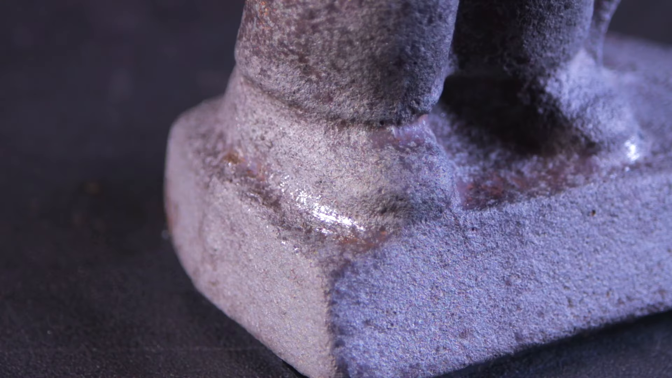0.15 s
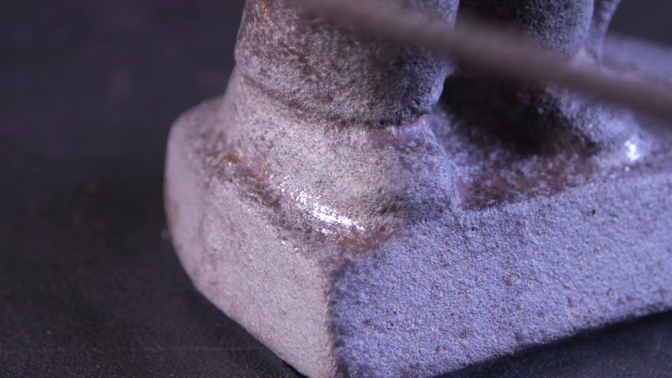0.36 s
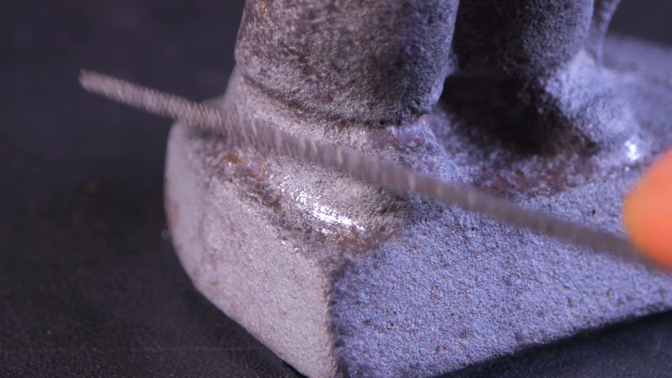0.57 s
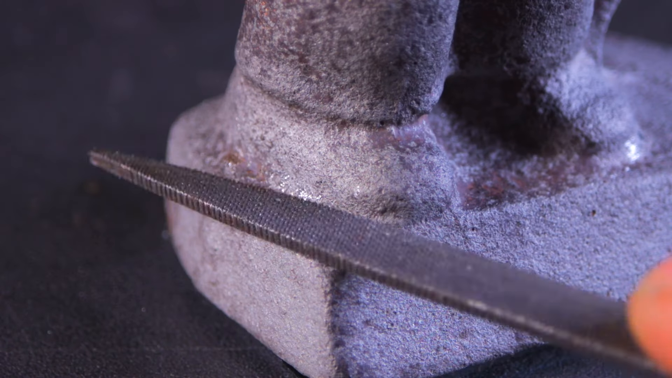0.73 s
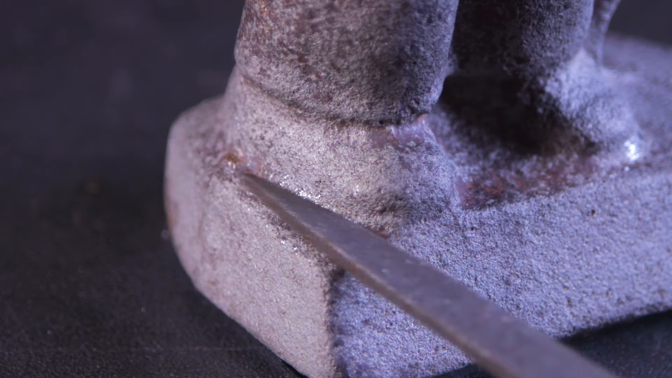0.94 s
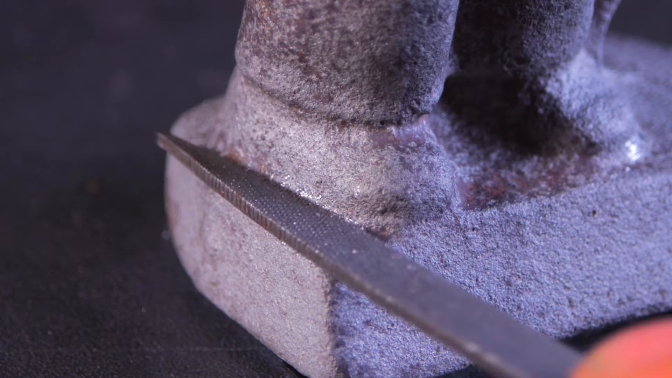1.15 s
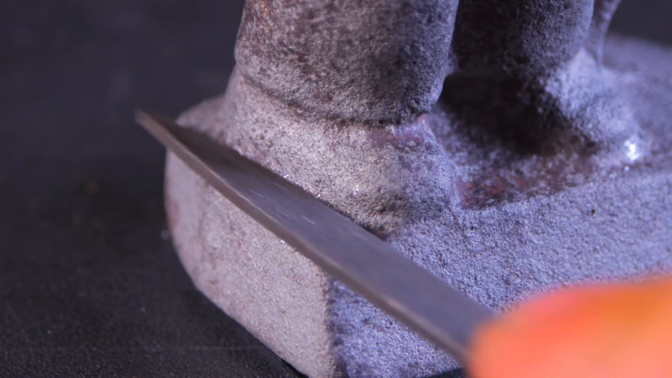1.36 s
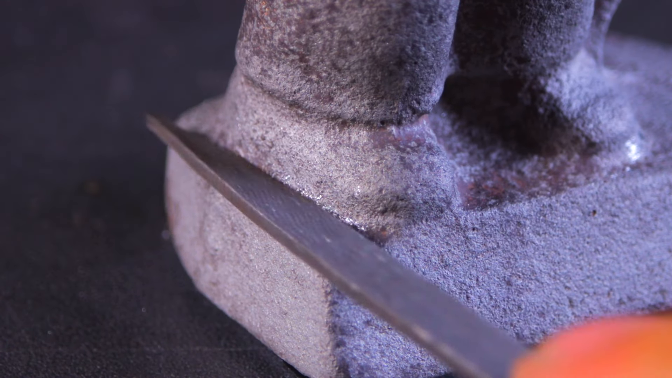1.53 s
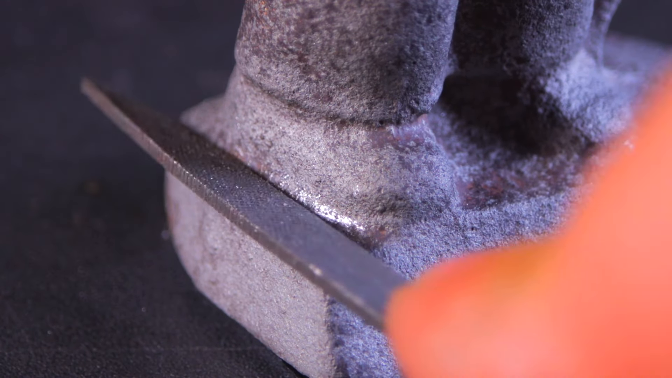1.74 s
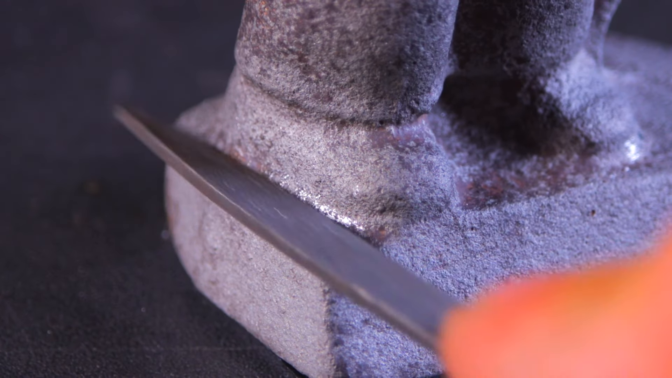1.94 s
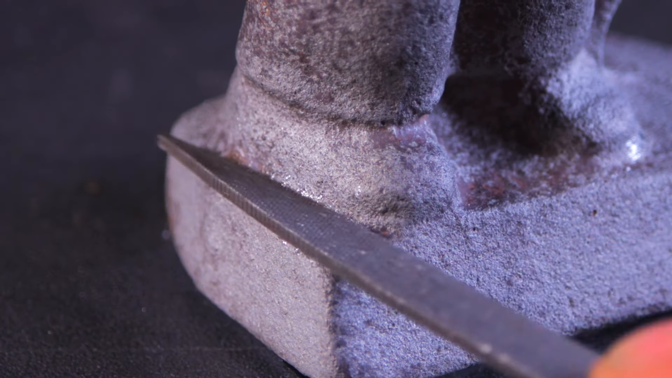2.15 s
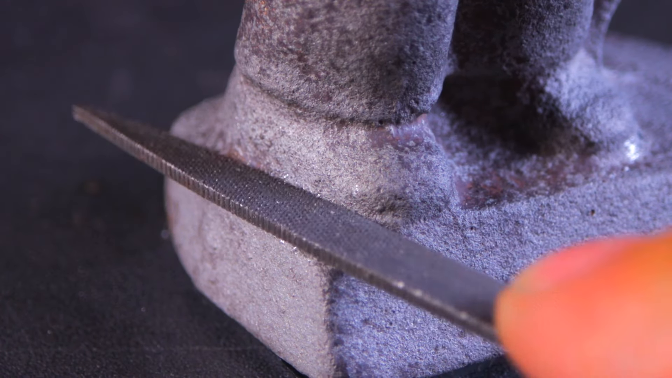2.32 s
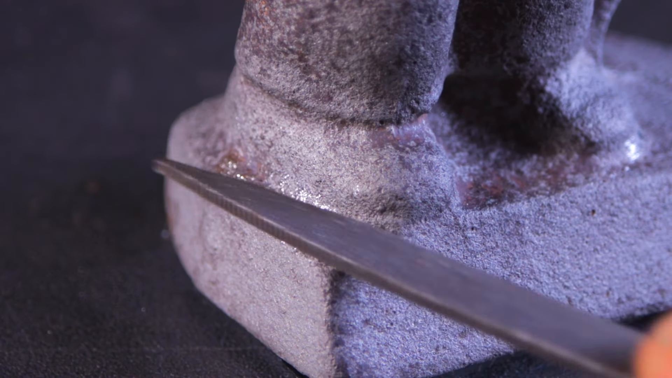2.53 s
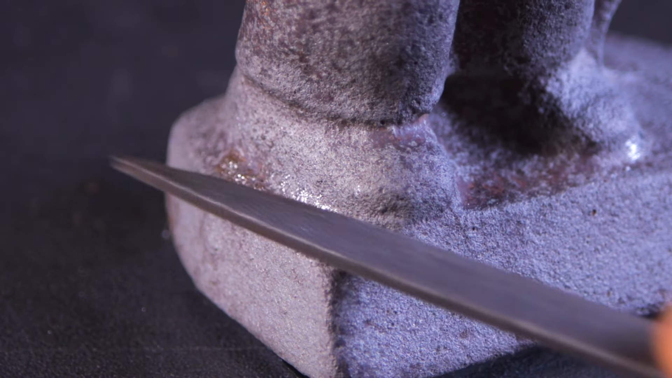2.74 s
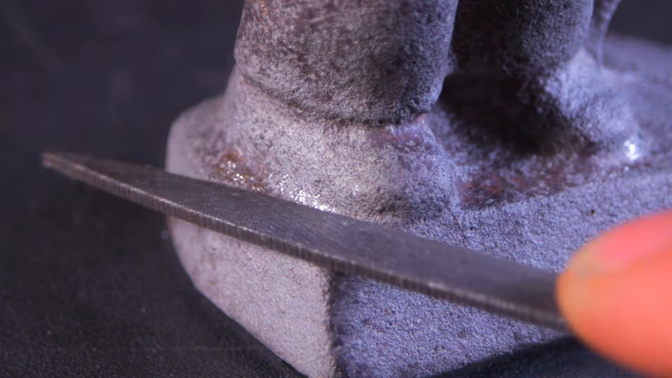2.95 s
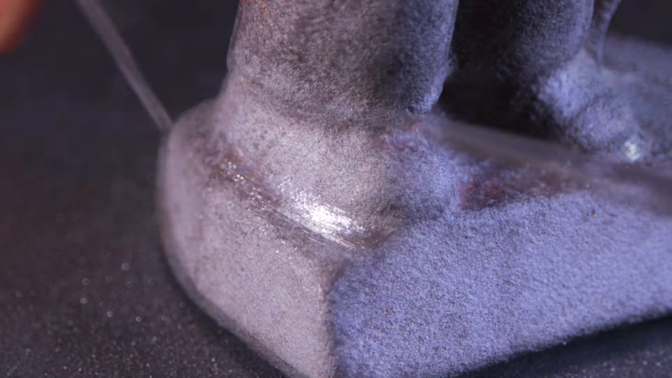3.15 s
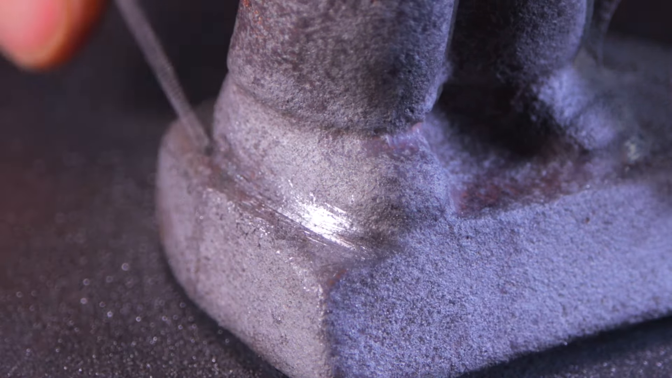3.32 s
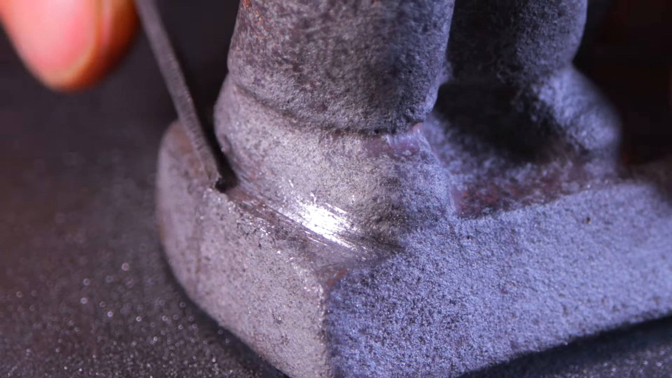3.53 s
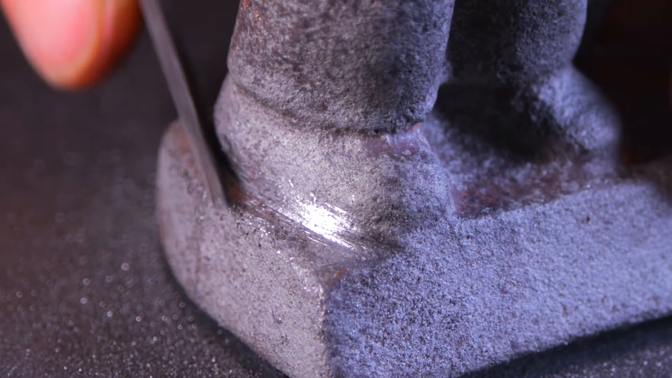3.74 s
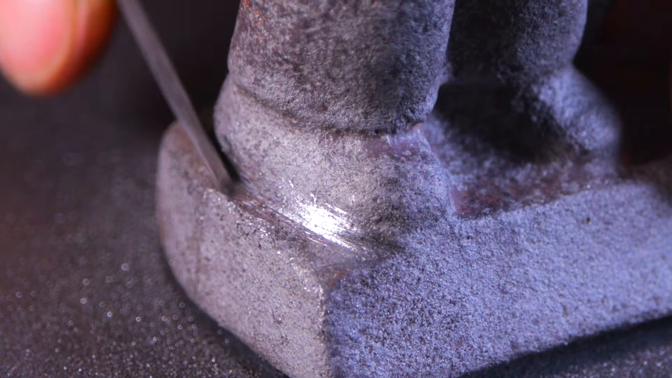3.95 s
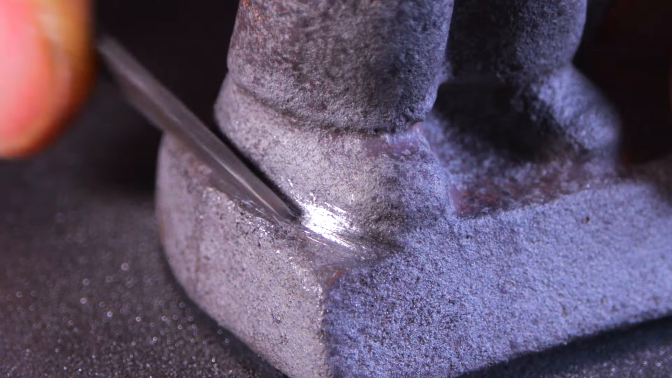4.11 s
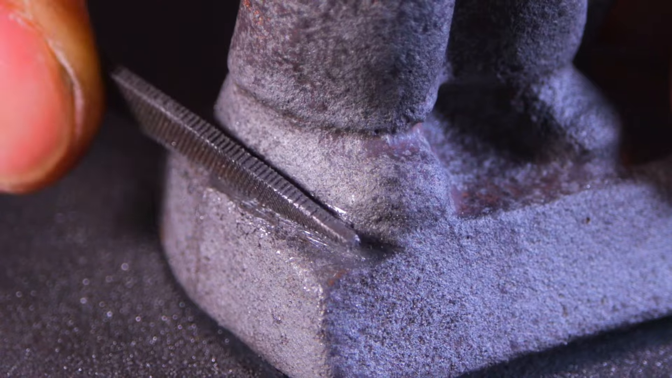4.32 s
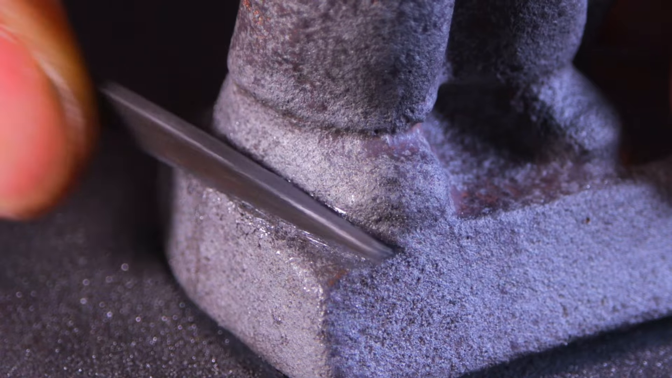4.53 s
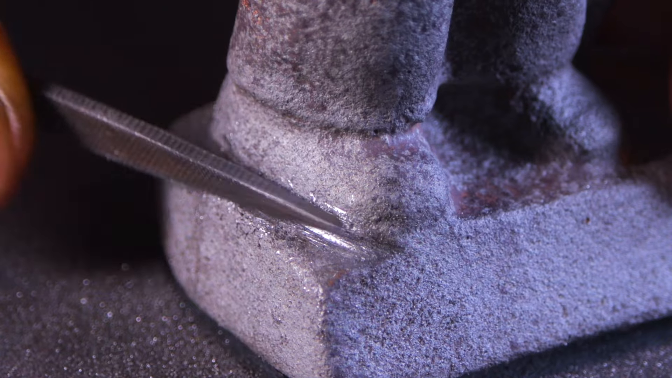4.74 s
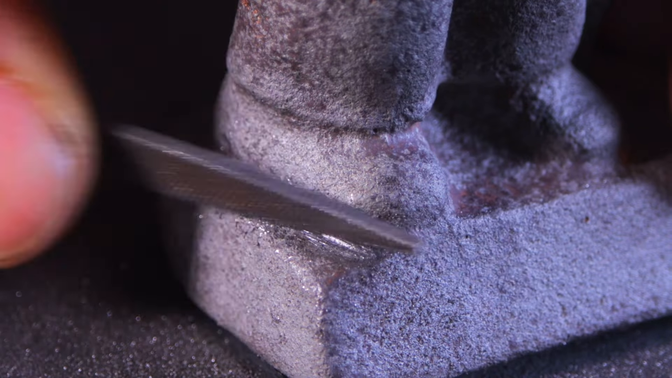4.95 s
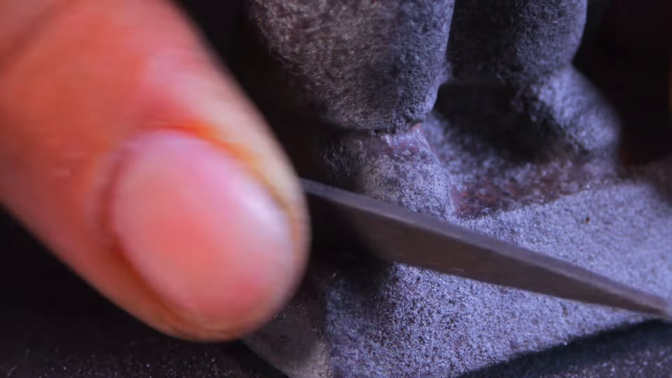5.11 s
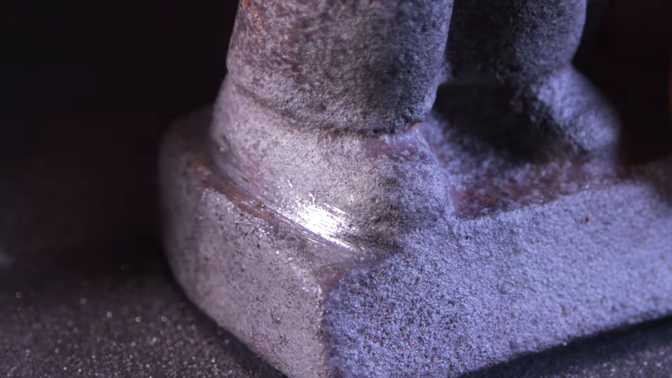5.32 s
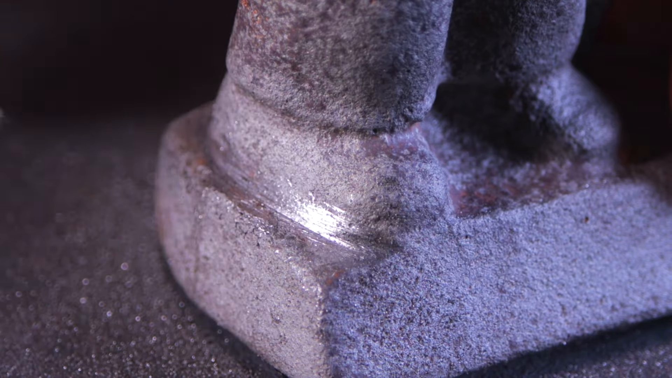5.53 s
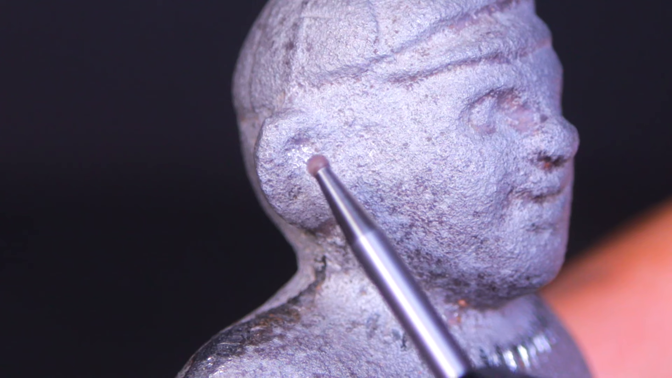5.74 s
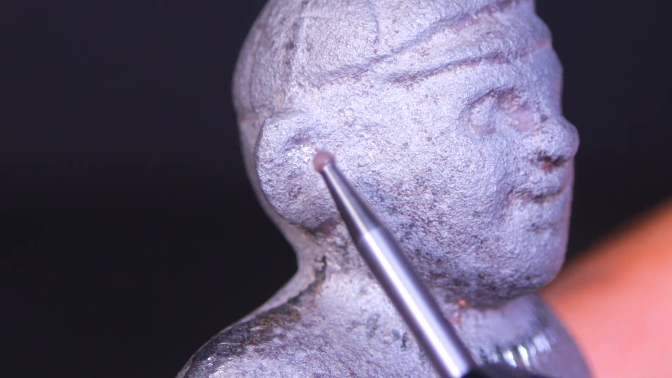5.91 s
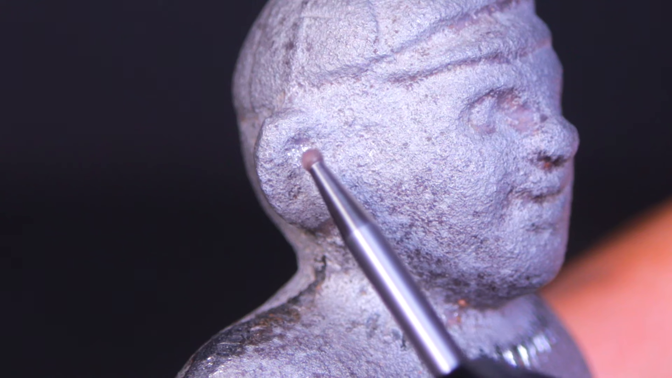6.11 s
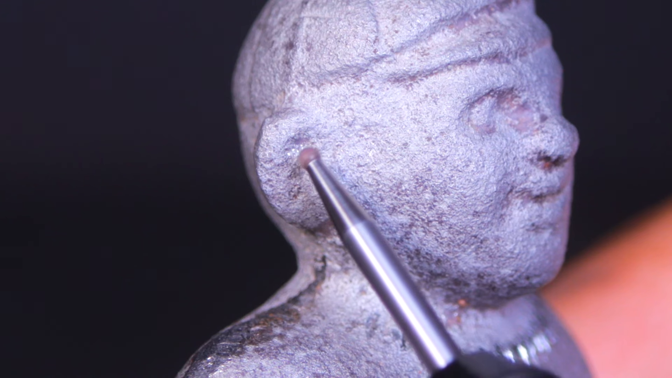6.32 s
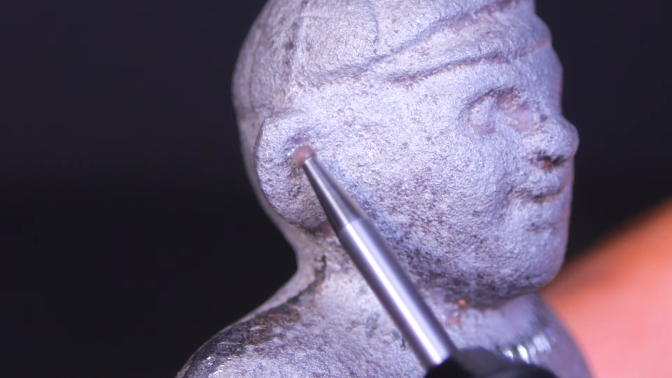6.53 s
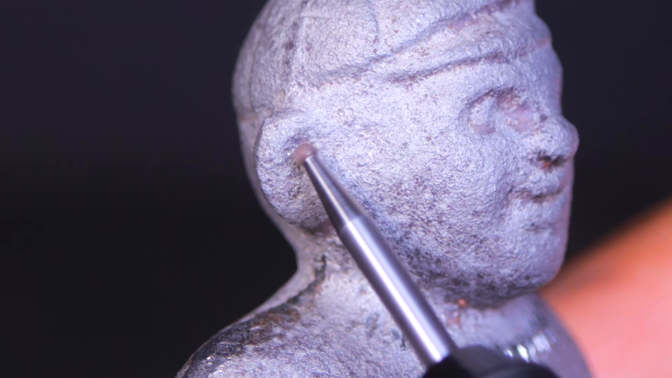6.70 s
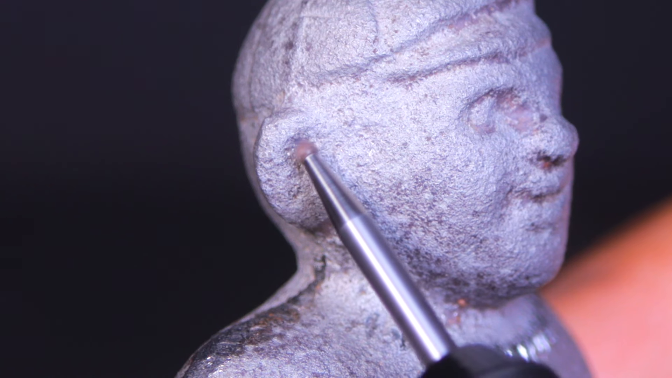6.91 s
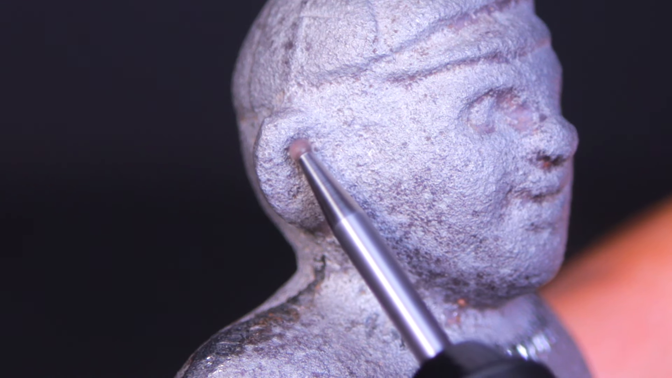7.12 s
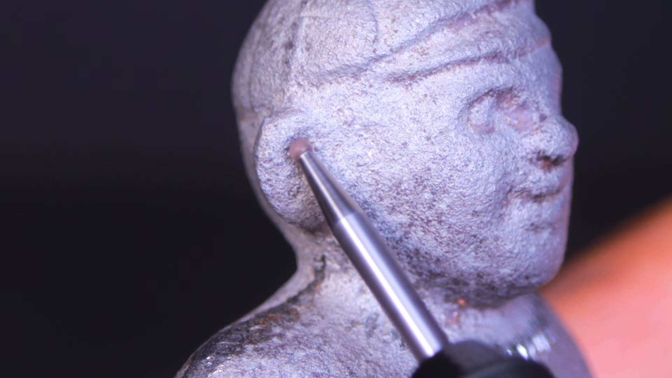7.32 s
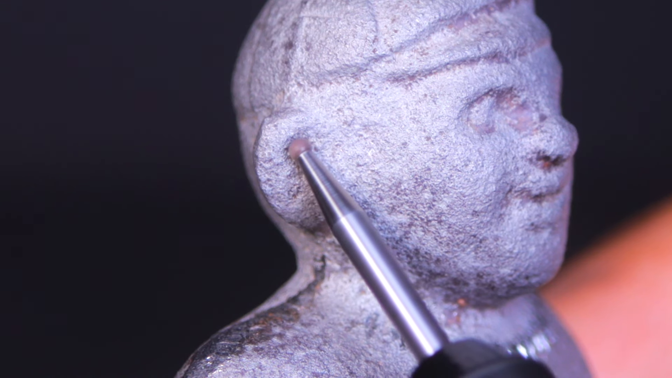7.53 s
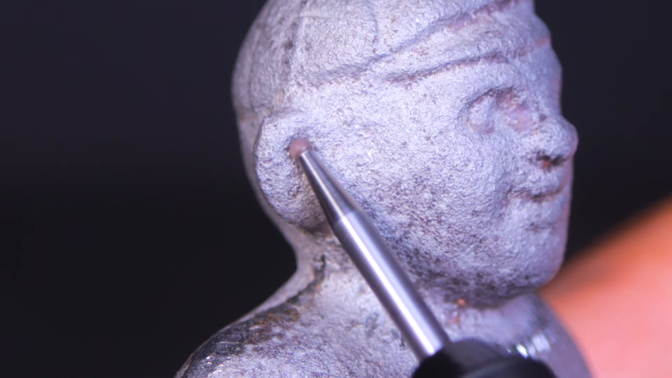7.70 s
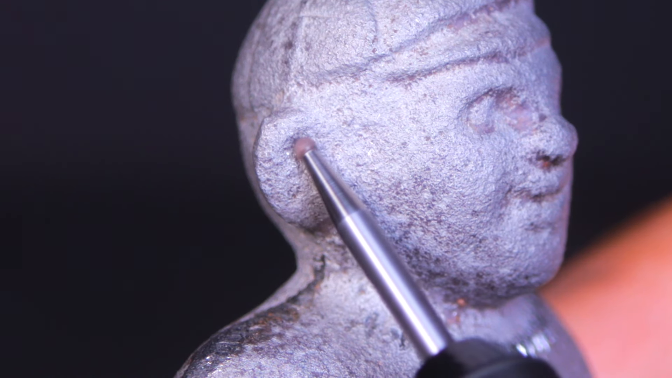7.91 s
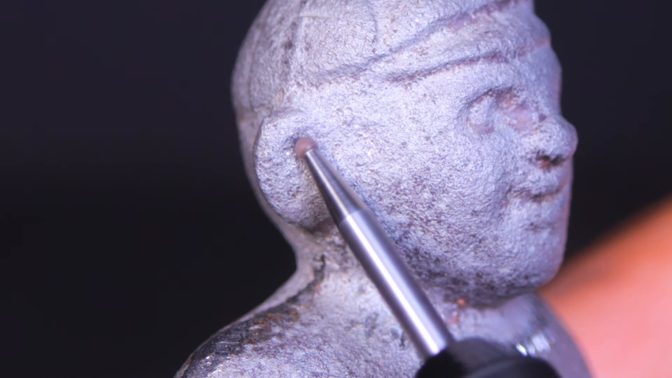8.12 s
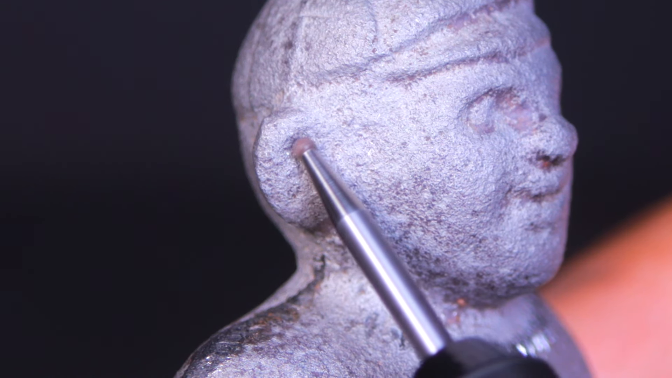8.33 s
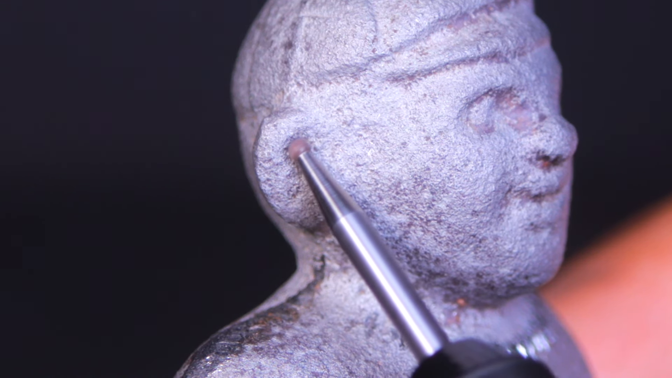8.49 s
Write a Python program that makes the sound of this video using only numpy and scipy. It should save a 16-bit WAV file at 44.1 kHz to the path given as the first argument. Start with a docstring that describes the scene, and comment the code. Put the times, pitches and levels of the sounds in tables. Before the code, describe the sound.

A small, dry, quiet workshop heard through two close microphones, with low rumble, soft hiss and, until about 3.2 s, a very faint high whistle. At 0.66-0.77 s a needle file clatters against a small cast-metal figure, its last knocks brightest. From 1.0 to 3.0 s the flat of the file rubs to and fro in short gritty rasps, about seven a second, stronger after 1.65 s, with metallic ringing, stray clicks and dull rocking on the bench. A few knocks follow near 3.1 s. From 3.45 to 5.2 s the tip files in similar but quieter, brighter strokes, starting faintly. At 5.73 s a rotary tool cuts in abruptly with a steady, airy, fluttering whirr and faint high whine. At 7.46 s its bit touches metal, dips, then chatters loudly around 7.6 s, thickening after 7.8 s into rough, buzzing grinding that continues to the end at about 8.6 s.

```python
"""A quiet workshop, with two microphones close to a small cast-metal figure being cleaned of rust.
A needle file knocks as it is set down, then rubs to and fro, first with its flat, then with its tip:
bursts of gritty noise ring the file and rock the figure on the bench.
Then a slow rotary tool whirrs, made of rubbing noise and tones locked to its turning shaft. Its bit touches
the metal, chatters once a turn and settles into grinding. Rumble and hiss fill the room throughout."""
import sys
import numpy as np
from scipy import signal
from scipy.fft import rfft, irfft, next_fast_len
from scipy.io import wavfile
from scipy.ndimage import map_coordinates

SR = 44100
rng = np.random.default_rng(int(sys.argv[2]) if len(sys.argv) > 2 else 0)


def dump_mix(stems):
    """Bounce the given channels to the path in sys.argv[1] as a 16-bit WAV at rate SR."""
    frames = np.atleast_2d(stems).T  # one column per channel
    limited = np.clip(frames, -1, 1)  # hard clip at full scale
    pcm = np.round(limited * 32767).astype(np.int16)
    wavfile.write(sys.argv[1], SR, pcm)


N = 381906
T = np.arange(N) / SR  # seconds
FFT_SIZE = next_fast_len(N, real=True)
TOUCH_S = 7.4645  # the bit first meets the metal

# How the flat of the file reaches the two microphones: two lists, left against right.
# Each row of the first: frequency in Hz, level difference in dB; of the second: Hz, phase lead in radians.
FLAT_PORTS = [
    [(60, 0), (110, 1.5), (200, 4), (380, 4), (700, 2.5), (1290, 2.5), (2380, 3), (4400, 0), (6500, 2),
     (8120, 3), (15000, 1)],
    [(0, 0), (430, 0), (1640, .15), (2330, .7), (2900, 0), (6000, 0), (8700, -.4), (11000, -.05),
     (15300, -.15)],
]


def undb(db):
    """Decibels to gain."""
    return 10 ** (np.asarray(db) / 20)


def curves(rows):
    """The columns of a table, joined by straight lines in time."""
    s, *columns = np.transpose(rows)
    return [np.interp(T, s, c) for c in columns]


def by_frequency(points):
    """A table of (Hz, value) spread over all frequencies of the sound."""
    hz, value = np.transpose(points)
    bin_hz = np.arange(FFT_SIZE // 2 + 1) * SR / FFT_SIZE
    return np.interp(np.log(bin_hz + 1), np.log(hz + 1), value)


def unit(x):
    """Scale to rms 1."""
    return x / np.sqrt(np.mean(x ** 2) + 1e-18)


def noise():
    """White noise."""
    return rng.standard_normal(N)


def walk(rate):
    """Smooth chance: random points, rate of them a second, joined by straight lines; spread about 1.3."""
    return 1.64 * np.interp(T * rate, np.arange(N), noise())


def tone(cycles, db):
    """A sine of the given rms level that follows a count of cycles from a random phase."""
    return np.sqrt(2) * undb(db) * np.sin(2 * np.pi * (cycles + rng.random()))


def colour(x, points, size=4096):
    """Causal filter through (Hz, dB) points, with power gain 1 for white noise."""
    hz, db = np.transpose(points)
    f = np.maximum(np.arange(size // 2 + 1) * SR / size, 1)
    # folding the cepstrum forward in time gives the minimum-phase response
    cepstrum = irfft(np.log(undb(np.interp(np.log(f), np.log(hz), db))))
    cepstrum[1:size // 2] *= 2
    cepstrum[size // 2 + 1:] = 0
    response = irfft(np.exp(rfft(cepstrum)))
    return signal.fftconvolve(x, response / np.linalg.norm(response))[:N]


def resonate(x, modes):
    """The sound plus the resonances that it excites; each mode is (Hz, width Hz, dB)."""
    return x + sum(undb(db) * signal.lfilter(*signal.iirpeak(hz, hz / width, SR), x)
                   for hz, width, db in modes)


def grit(rate, spread_db):
    """Dense random clicks of very unequal size, rate of them a second."""
    hit = rng.random(N) < rate / SR
    return unit(hit * noise() * undb(spread_db * np.minimum(rng.exponential(size=N), 4)))


def place(x, ports, room_db, t60=0.14, echo_low_hz=170, dullness=0.56):
    """Direct sound as each microphone hears it, plus the dull, thin echo of a small room."""
    t = T[:SR // 2]
    tails = rng.standard_normal((2, len(t))) * undb(-60 * t / t60) * (t > .004)
    tails = signal.lfilter([1], [1, -min(dullness, .9)], tails)
    tails = signal.sosfilt(signal.butter(2, echo_low_hz, "high", fs=SR, output="sos"), tails)
    tails /= np.linalg.norm(tails, axis=1, keepdims=True)
    echo = signal.fftconvolve(x[None], tails, axes=1)[:, :N]
    # half of each difference goes to the left microphone, its opposite to the right
    balance, lead = (by_frequency(p) for p in ports)
    left = undb(balance / 2) * np.exp(1j * lead / 2)
    direct = irfft(rfft(x, FFT_SIZE) * np.array([left, 1 / left]), FFT_SIZE)[:, :N]
    return direct + undb(room_db) * echo


def stroke_levels(strokes, speed_power, skew, rock_lag_s, rock_spread):
    """The rasp follows the file's speed, a skewed half sine; the rocking swells later and lasts longer."""
    rasp, rocking_power = np.zeros(N), np.zeros(N)
    for start, length, rasp_db, rock_db in strokes:
        near = slice(int((start - length) * SR), int((start + 2 * length) * SR))
        along = (T[near] - start) / length  # 0 to 1 through the stroke
        speed = np.abs(np.sin(np.pi * np.clip(along, 0, 1) ** skew))
        rasp[near] += undb(rasp_db) * speed ** speed_power
        swell = np.exp(-((along - .5 - rock_lag_s / length) / rock_spread) ** 2)
        rocking_power[near] += undb(rock_db) ** 2 * swell
    return rasp, np.sqrt(rocking_power)


def filing(levels, rasp_colour, body_colour, modes, ports, teeth_hz, catch_db, rasp_db, body_db):
    """Teeth break off grains of rust; the jerky drag rocks the figure on the bench."""
    # The figure on the bench. Each row: frequency in Hz, width in Hz, level in dB.
    bench_modes = [(198, 10.7, 3), (203, 25, 3.5), (234.4, 10, 4), (332.6, 14, 2), (472, 78, 0.5),
                   (622, 43, -4), (735, 59, 2), (890, 29, -3)]
    rasp_level, body_level = levels
    drag = undb(catch_db * walk(teeth_hz))
    grains = unit(drag * (grit(3500, 1.8) + 0.49 * noise()))
    rasp = unit(resonate(colour(grains, rasp_colour), modes)) * rasp_level * undb(rasp_db)
    rocking = unit(resonate(colour(grit(2500, 0.15), body_colour), bench_modes))
    body = rocking * body_level * undb(body_db)
    return place(rasp, ports, -15) + place(body, ports, -10.5, t60=0.11)


def flat_filing():
    """The flat of the file rubs to and fro, one burst of rasp and rocking for each stroke."""
    # Each row: start in seconds, length in seconds, rasp and rocking of the figure in relative dB.
    strokes = [(1.025, 0.14, -48, -46), (1.215, 0.085, -54, -48.5), (1.338, .14, -51.5, -46),
               (1.515, .115, -53, -48.5), (1.648, 0.13, -45.5, -42), (1.822, .12, -45.5, -44.5),
               (1.955, .13, -49.5, -43), (2.128, 0.11, -46.5, -45), (2.291, 0.098, -46.5, -42.5),
               (2.418, .13, -44.5, -45), (2.574, .13, -47.5, -45), (2.724, 0.12, -48.5, -45.5),
               (2.878, 0.15, -48.5, -44.5)]
    # Colour of the rasp, then of the rocking. Each row: frequency in Hz, relative level in dB.
    rasp_colour = [(530, -25), (900, -4), (1160, 2), (1260, -17.5), (1430, -1.5), (1730, -6), (2020, -5),
                   (2220, -6.5), (2960, -6), (3220, -10), (4280, -7), (5500, -15), (7500, -13.5),
                   (8650, -8), (15500, -25.5)]
    body_colour = [(35, -32), (60, -13.5), (91, 1.5), (161, -10.5), (215, 0), (385, -9), (557, -13),
                   (610, -8), (1400, -17), (1820, -40), (3080, -120)]
    # The file rings, laid flat. Each row: frequency in Hz, width in Hz, level in dB.
    modes = [(1330, 39, 5), (2660, 200, -28), (4250, 300, 1.5), (8560, 40, 5.5)]
    levels = stroke_levels(strokes, speed_power=1.24, skew=0.94, rock_lag_s=0.0069, rock_spread=.35)
    return filing(levels, rasp_colour, body_colour, modes, FLAT_PORTS,
                  teeth_hz=250, catch_db=1.73, rasp_db=-1.0, body_db=-0.5)


def tip_filing():
    """The tip of the file rubs to and fro, with a colour and ringing of its own."""
    # Each row: start in seconds, length in seconds, rasp and rocking of the figure in relative dB.
    strokes = [(3.44, 0.14, -64, -61.5), (3.605, .09, -53.5, -56.5), (3.722, 0.11, -47, -49.5),
               (3.868, 0.098, -52, -53), (3.988, .13, -47, -50), (4.138, 0.1, -52.5, -54.5),
               (4.266, 0.11, -49, -51), (4.395, 0.08, -55.5, -54.5), (4.526, .11, -48, -49.5),
               (4.66, 0.089, -53, -51.5), (4.798, 0.11, -45.5, -50), (4.938, .113, -49.5, -49),
               (5.07, 0.14, -46, -49)]
    # Colour of the rasp, then of the rocking. Each row: frequency in Hz, relative level in dB.
    rasp_colour = [(530, -15), (900, -2.5), (1130, 3.5), (1330, -7.5), (1450, -4.5), (1610, -6.5),
                   (1980, 1), (2510, -2), (3420, -5), (4390, -4.5), (5120, -7.5), (7500, -3.5),
                   (8250, -3.5), (13800, -13), (15500, -21)]
    body_colour = [(35, -57), (60, -20), (91, 3.5), (168, -11.5), (236, -2.5), (333, -7.5), (390, -20),
                   (494, -13), (1400, -14.5), (1820, -33), (3080, -120)]
    # The file rings, held on its tip. Each row: frequency in Hz, width in Hz, level in dB.
    modes = [(1440, 170, 5.5), (1940, 150, -12), (4400, 170, 1), (8170, 100, 2), (8670, 100, 6),
             (9260, 140, 2)]
    # Left microphone against right. Rows of the first list: Hz, dB; of the second: Hz, lead in radians.
    ports = [
        [(60, 0.5), (110, 1.0), (200, 2.0), (380, 2.3), (700, 3.2), (1290, 2.0), (2380, 3.9), (4400, 3.7),
         (8120, 4.5), (15000, 1.0)],
        [(0, 0), (1030, 0.43), (1810, 0.0), (2410, 0.5), (2670, -0.0), (6030, -0.13), (8100, -0.42),
         (8530, 0.0), (8870, -0.37), (10800, 0.0), (13800, 0.0), (14100, -0.1), (15100, 0.1), (15300, -0.1)],
    ]
    levels = stroke_levels(strokes, speed_power=1.02, skew=1.0, rock_lag_s=0.0085, rock_spread=0.36)
    return filing(levels, rasp_colour, body_colour, modes, ports,
                  teeth_hz=304.0, catch_db=1.2, rasp_db=-1.0, body_db=0.5)


def knocks(dull_db=8, bright_db=7, decay_s=0.0019, split_hz=2700):
    """Each knock is a short crunch that rings the file; its dull part lingers in the room."""
    # The file knocks or a tooth catches. Each row: time in seconds, dull and bright parts in relative dB.
    blows = [(.664, -47.5, -62), (0.696, -45.5, -58), (.711, -45.5, -59), (.725, -49, -41),
             (0.737, -38, -30.5), (0.763, -33.5, -30.5), (1.044, -44, -50), (1.057, -54, -45),
             (1.448, -49, -46), (1.666, -50, -41), (1.752, -38, -49), (1.879, -39, -39.5),
             (1.970, -46, -45.5), (2.140, -43.5, -49), (2.171, -62, -41), (2.306, -43, -45),
             (2.578, -52, -54), (2.778, -36, -60), (2.848, -48, -49), (2.900, -46, -48.5),
             (3.068, -45, -50), (3.074, -42, -44), (3.083, -45.5, -48), (3.294, -54, -58), (3.62, -64, -54),
             (4.302, -46, -46), (4.451, -49, -47.5), (4.665, -48, -61), (5.094, -38.5, -48),
             (5.232, -53, -57)]
    # Colour of the crunch. Each row: frequency in Hz, relative level in dB.
    crunch_colour = [(240, -70), (400, -1.5), (886, 6), (1240, 2.5), (2920, 3), (3360, -5), (4350, 0),
                     (5650, -1), (8670, 4), (15500, -11.5)]
    # The file rings when it knocks. Each row: frequency in Hz, width in Hz, level in dB.
    modes = [(885, 87, -4), (1850, 110, -7.5), (1900, 19, 1), (4400, 290, -1), (8400, 110, -5)]
    dull, bright = np.zeros(N), np.zeros(N)
    age = T[:SR // 20]
    crunch = np.exp(-age / decay_s) * (1 - np.exp(-age / .0003))
    for s, low_db, high_db in blows:
        i = int(s * SR)
        dull[i:i + len(age)] += undb(low_db + dull_db) * crunch
        bright[i:i + len(age)] += undb(high_db + bright_db) * crunch

    def ring(push, side):
        """Crunching noise rings the file; one side of the split frequency is kept."""
        rung = resonate(colour(push * noise(), crunch_colour), modes)
        return signal.sosfilt(signal.butter(3, split_hz, side, fs=SR, output="sos"), rung)

    return (place(ring(dull, "low"), FLAT_PORTS, -8.5, t60=0.21)
            + place(ring(bright, "high"), FLAT_PORTS, -13, t60=0.16))


def shaft():
    """Turns of the shaft, its speed wandering slightly, counted from the first touch of the bit."""
    # Rotary tool before the wander. Each row: time in seconds, turns per second.
    speed = [(5.7, 52.9), (7.4, 52.85), (7.6, 53.7), (7.72, 53.4), (7.8, 51.1), (7.9, 51.5), (8.2, 51.6),
             (8.3, 51.2), (8.66, 50.8)]
    turns = np.cumsum(curves(speed)[0] + .06 * walk(6)) / SR
    return turns - turns[int(TOUCH_S * SR)]


def surface(turns, size=830):
    """Roughness of a turning part: the same bumps come round on every turn."""
    bumps = rng.standard_normal(size)
    return unit(map_coordinates(bumps, [turns % 1 * size], order=3, mode="grid-wrap"))


def bit_contact(turns, seating, scatter_db=1.1, bounce_turns=.125, bite=0.18, skid=0.31):
    """The off-centre bit strikes once a turn; once seated, two more lobes strike, each skipping along."""
    lobe = np.floor(3 * turns).astype(int)
    since = turns - lobe / 3  # turns since this lobe arrived
    force = np.where(lobe % 3 == 0, 1, seating) * undb(scatter_db * walk(150))
    sweep = np.abs(np.sin(np.pi * np.abs(3 * since) ** .65))  # digs in fast and lifts off slowly
    return force * sweep * (skid + np.exp(-(since / bounce_turns % 1) / bite))


def grinding(turns, scratch_db=-36, scratch_push=0.95, ring_db=-34.0, ring_bed=0.17, thud_db=-51.5,
             thud_push=0.83, thud_seated_db=3, hum_db=-1.5, growl_db=0):
    """Contacts scratch, ring the bit and thud the figure; ring follows the push in step, the others less."""
    # How hard the hand pushes the bit. Each row: time in seconds, dB relative to steady grinding.
    push_rows = [(7.468, -2.5), (7.486, -10.5), (7.525, -8), (7.6, 2.5), (7.655, 1), (7.69, 1),
                 (7.725, 0.5), (8.0, -1), (8.4, 0), (8.66, 2.5)]
    # How firmly the bit sits. Each row: time in seconds, seating from 0 (one graze a turn) to 1 (three lobes).
    seating_rows = [(7.46, .02), (7.66, .1), (7.74, .27), (7.82, .62), (7.95, .66), (8.1, .9), (8.35, .8),
                    (8.66, .7)]
    # Colours of scratch, ring and thud. Each row: frequency in Hz, relative level in dB.
    scratch_colour = [(1350, -34), (2300, 1), (3120, -6.5), (3430, 9.5), (4360, 0), (4760, 7), (7030, -7.5),
                      (7560, -4), (8320, -1.5), (9080, 5.5), (11300, 2.5), (12200, 4.5), (13900, -3.5),
                      (14800, -27), (15500, -28)]
    ring_colour = [(500, -44), (800, -17), (950, -16), (1250, -12.5), (1500, -11), (1700, -4), (1800, 2),
                   (1950, 0.5), (2100, -5.5), (2400, -22.5), (3000, -15.5), (4000, -54)]
    thud_colour = [(35, -34), (60, -13), (160, -9.5), (210, -2), (340, -11.5), (460, -1), (560, -12),
                   (660, -1), (800, -11.5), (1200, -31.5)]
    # The figure hums. Each row: seconds, relative dB at twice and at three times the strike rate.
    hum_rows = [(7.65, -61.5, -90), (7.84, -46, -46), (8.17, -44.5, -58), (8.27, -43.5, -42.5),
                (8.46, -45, -42), (8.53, -54.5, -53), (8.66, -49, -40.5)]
    # Growl of the seated bit. Each row: multiple of the turning rate, relative level in dB.
    growl_orders = [(5, -58), (7, -59), (8, -57), (10, -60), (12, -57), (13, -55), (15, -60), (17, -59),
                    (18, -55), (21, -57), (24, -55), (25, -56), (27, -52), (32, -50), (35, -44)]
    # Left microphone against right. Rows of the first list: Hz, dB; of the second: Hz, lead in radians.
    ports = [
        [(60, .5), (110, .5), (200, 3.5), (380, -1), (700, 2.5), (1300, 2), (2400, 1), (3000, 0), (7000, 0),
         (8500, 2), (10000, 1.5), (12000, 0), (15000, -1)],
        [(0, 0), (780, .15), (1380, 0), (15300, 0)],
    ]

    push_db, = curves(push_rows)
    seating, = curves(seating_rows)
    contact = bit_contact(turns, seating)
    # the same effort is shared between more blows as the bit seats
    share = (T > TOUCH_S - .001) / np.sqrt(1 + 2 * seating ** 2)

    def shaped(x, db):
        """Share the effort, level the sound after the touch, then follow the dB curve."""
        shared = x * share
        return shared / np.std(shared[T > TOUCH_S]) * undb(db)

    scrape = contact ** 1.15 + .12 * seating
    scratch = colour(scrape * (noise() + .6 * surface(turns)), scratch_colour)
    ring_drive = contact + ring_bed * np.sqrt(seating)
    ring = colour(ring_drive * (noise() + 1.1 * surface(turns)), ring_colour)
    thud = colour(contact * (noise() + .7 * surface(turns)), thud_colour)

    # three strikes a turn, so 6 and 9 cycles a turn are twice and three times the strike rate
    hum = sum(np.sqrt(2) * undb(db + hum_db + walk(40)) * np.sin(2 * np.pi * k * turns)
              for k, db in zip((6, 9), curves(hum_rows)))
    growl = sum(tone(k * turns, db + 2 * walk(9.1)) for k, db in growl_orders)
    tones = (hum + seating * undb(growl_db) * growl) * (T > TOUCH_S)

    scratch = shaped(scratch, scratch_db + scratch_push * push_db)
    ring = shaped(ring, ring_db + push_db)
    thud = shaped(thud, thud_db + thud_push * push_db + thud_seated_db * (seating - .5))
    return place(scratch + tones, ports, -58) + place(ring, ports, -19) + place(thud, ports, -11)


def motor(turns, repeat=0.66, lope=0.027, whirr_db=-41.8, whine_db=0, hum_db=-1, drive_hz=7728, on_s=5.733):
    """Brushes and bearings rub and tick three times a turn; the rotor hums, the drive current whines."""
    # Colour of the whirr. Each row: frequency in Hz, relative level in dB.
    whirr_colour = [(290, -45), (500, -22), (851, -21.5), (1090, -14), (1170, -16), (2200, -9.5),
                    (3150, -9), (4640, -5), (5350, -8.5), (6270, -1.5), (7130, -5), (7780, 0.5),
                    (10400, -11.5), (14600, -21), (15500, -14.5)]
    # The tool's housing rings. Each row: frequency in Hz, width in Hz, level in dB.
    housing_modes = [(4260, 72, 3), (4800, 290, 0.5), (5350, 120, -17), (9110, 250, 3.5), (10050, 660, 7)]
    # Whine of the chopped drive current. Each row: multiple of the drive, offset in commutations, relative dB.
    whine_rows = [(1, -1.5, -64), (1, -.5, -55), (1, .5, -53.5), (1, 1.5, -60), (1, 2.5, -65),
                  (1, 3.5, -66), (2, 0, -67), (2, 1, -77)]
    # Hum of the rotor. Each row: multiple of the turning rate, relative level in dB.
    rotor_orders = [(15, -82), (18, -80), (20, -80), (21, -71.5), (24, -73), (25, -75), (27, -75),
                    (29, -77), (31, -74), (41, -73), (42, -74), (66, -72), (81, -69), (90, -68), (108, -68),
                    (114, -66), (122, -66)]
    # Left microphone against right. Rows of the first list: Hz, dB; of the second: Hz, lead in radians.
    ports = [
        [(60, 0), (700, 1.5), (1300, .5), (2400, 0), (6000, 0), (8100, 1.2), (10500, 0), (15000, 0)],
        [(0, 0), (800, .2), (1100, .5), (1400, 0), (6200, 0), (7200, .55), (8300, .55), (10000, 0), (15300, 0)],
    ]
    ticks = 1 + .65 * np.exp(-(3 * turns % 1) / .18)
    load = ticks * (1 + lope * np.cos(2 * np.pi * turns)) * undb(0.8 * surface(turns, size=24))
    rub = load * (repeat * surface(turns) + grit(14000, 1.0))
    whirr = unit(resonate(colour(rub, whirr_colour), housing_modes)) * undb(whirr_db)
    commutations = 3 * turns + .02 * walk(12)
    whine = sum(tone(k * drive_hz * T + offset * commutations, db + whine_db) for k, offset, db in whine_rows)
    hum = sum(tone(k * turns, db + hum_db) for k, db in rotor_orders)
    wavering = (whine + hum) * undb(walk(12))
    return place((whirr + wavering) * (T > on_s), ports, -55)


def room_tone(whistle_db=-77):
    """Rumble, alike on both sides, and wider hiss, with a thin whistle until the first filing is over."""
    # Colour of the air. Each row: frequency in Hz, relative level in dB.
    air_colour = [(15, -67), (25, -33), (58, -11.5), (75, -6.5), (148, -8), (227, -13), (495, -22),
                  (648, -26.5), (848, -25.5), (3260, -30.5), (4620, -32), (5580, -31), (12200, -35),
                  (13200, -36), (15500, -36.5)]
    # Each row: frequency in Hz, side minus mid in dB.
    width = [(40, -30), (65, -27), (130, -14.5), (250, -7), (500, -2.5), (1000, -0.5), (15000, -1.5)]
    # Each row: time in seconds, level of the mid in dB before a slight waver.
    level = [(0, -61), (2.9, -59), (3.2, -63), (3.6, -60), (8.66, -62)]
    mid, side = (unit(colour(noise(), air_colour)) for _ in range(2))
    side = irfft(rfft(side, FFT_SIZE) * undb(by_frequency(width)), FFT_SIZE)[:N]
    air = np.array([mid + side, mid - side]) * undb(curves(level)[0] + 0.3 * walk(2.3))
    whistle = np.sin(2 * np.pi * 13500 * T) * (T < 3.25)
    return air + undb(whistle_db) * whistle


def scene():
    """Filing, then the rotary tool, over the room."""
    turns = shaft()
    hand_work = flat_filing() + tip_filing() + knocks()
    return hand_work + grinding(turns) + motor(turns) + room_tone()


def record(dry):
    """The recorder cuts the deepest bass and the top."""
    dry = signal.sosfilt(signal.butter(2, 36, "high", fs=SR, output="sos"), dry)
    return signal.sosfilt(signal.ellip(10, .2, 70, 15600, fs=SR, output="sos"), dry)


dry = scene()
out = record(dry)
dump_mix(out)
```